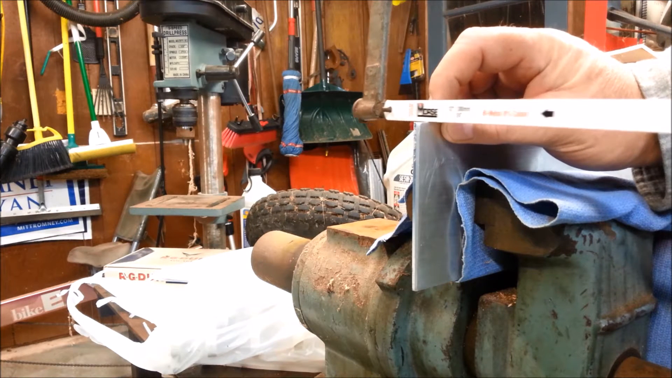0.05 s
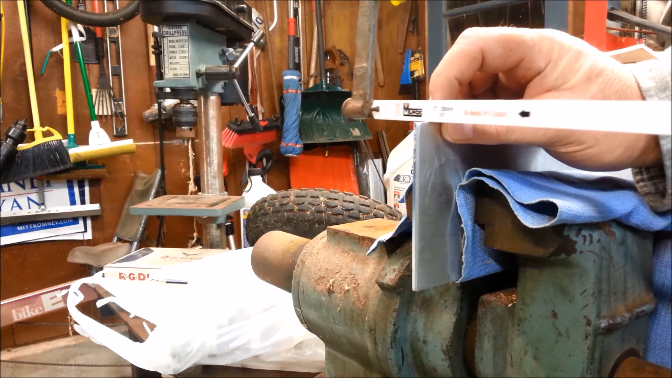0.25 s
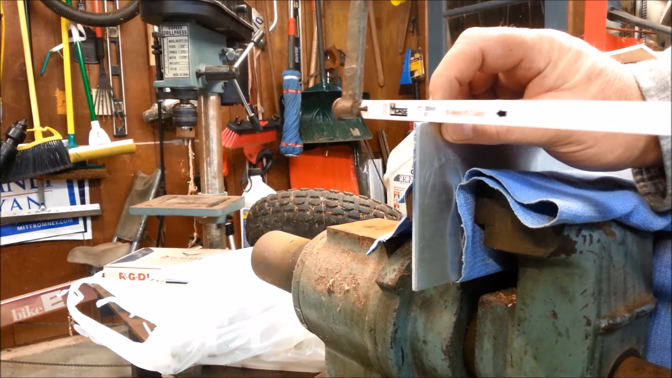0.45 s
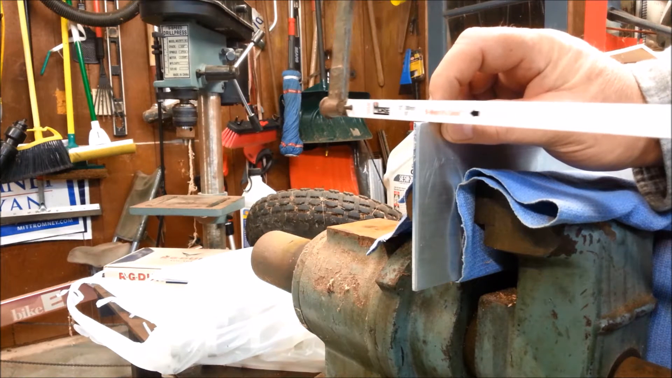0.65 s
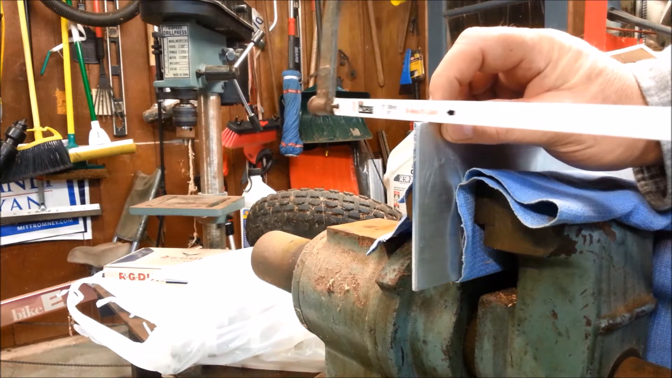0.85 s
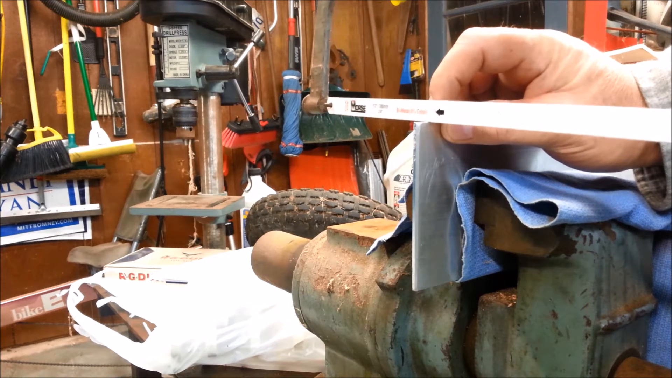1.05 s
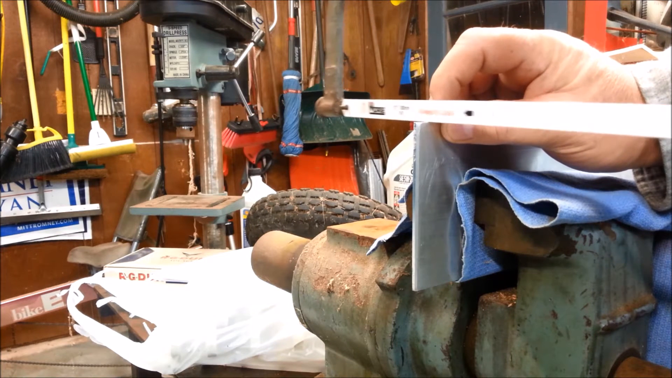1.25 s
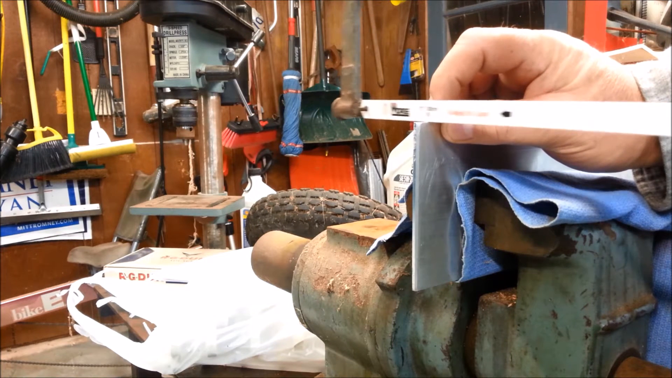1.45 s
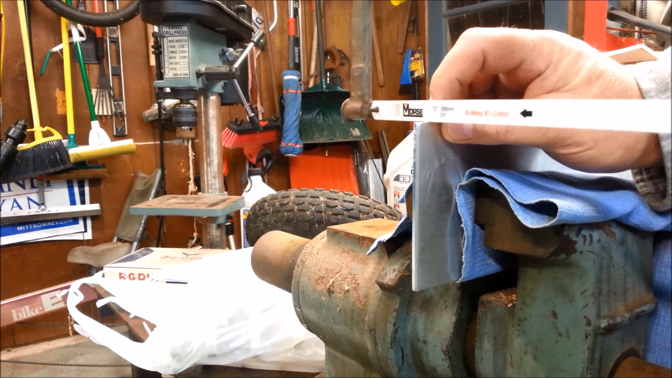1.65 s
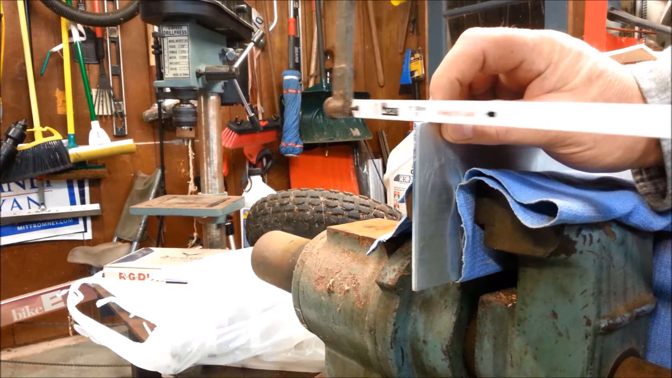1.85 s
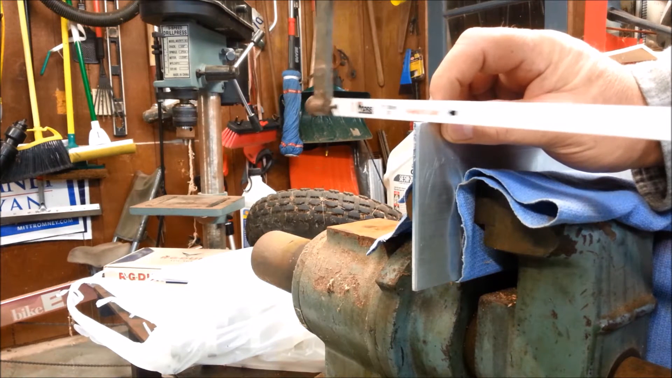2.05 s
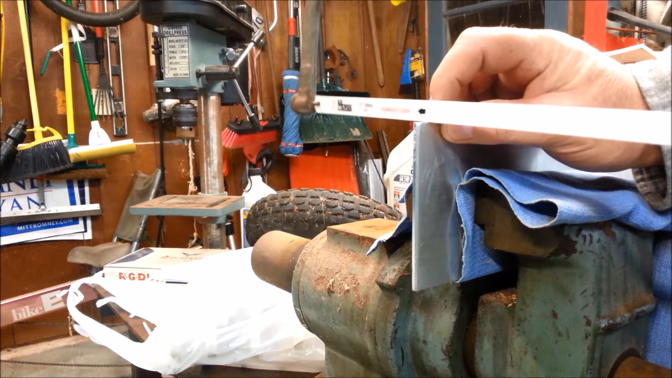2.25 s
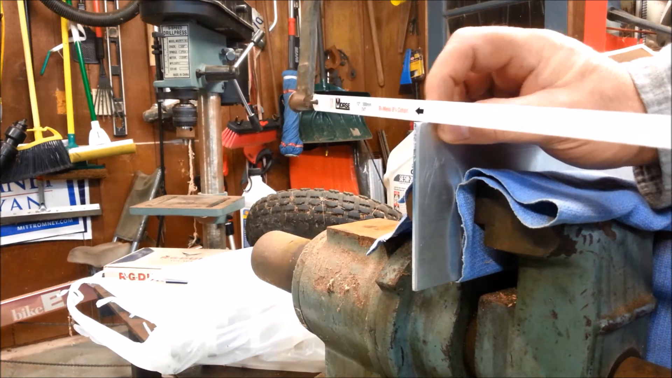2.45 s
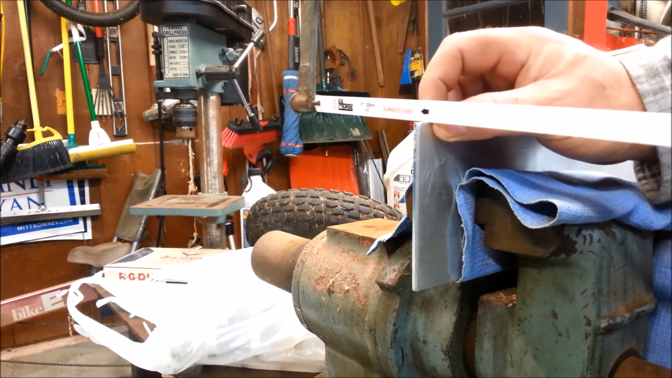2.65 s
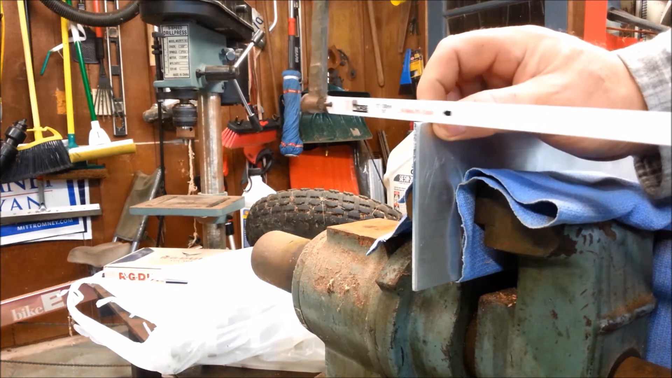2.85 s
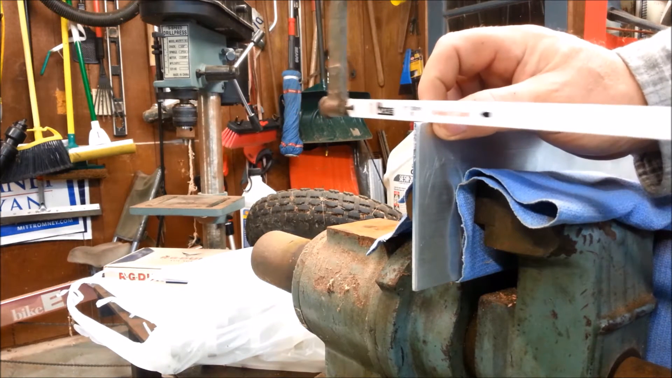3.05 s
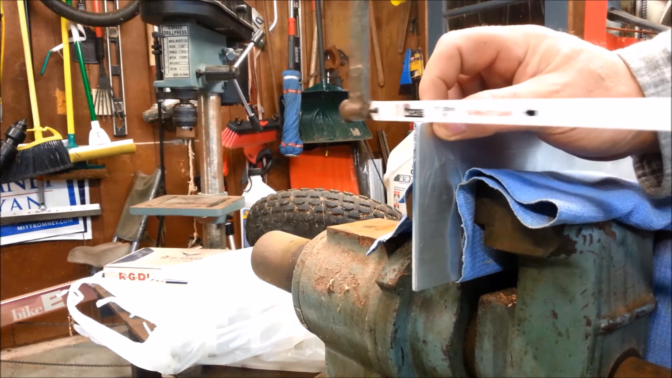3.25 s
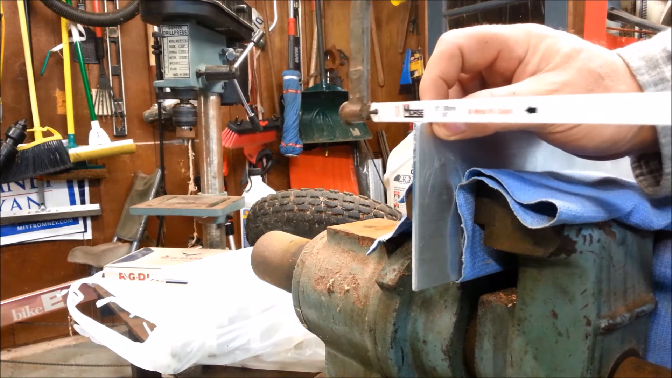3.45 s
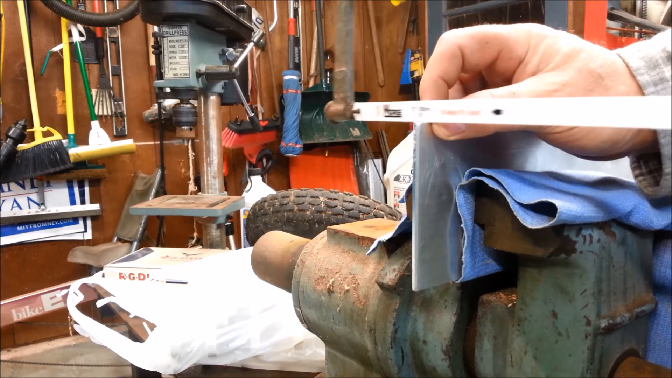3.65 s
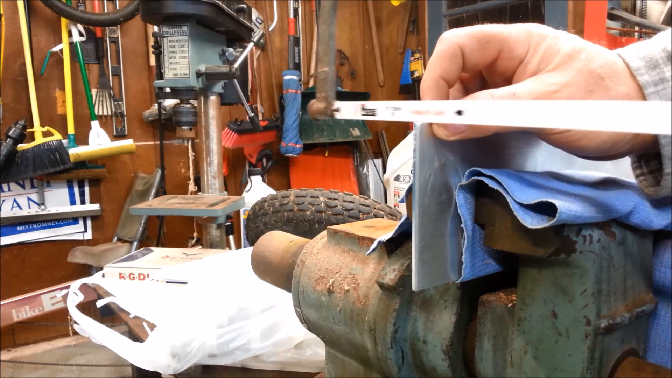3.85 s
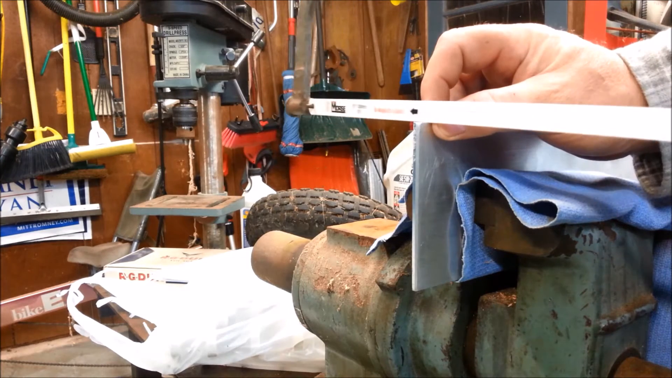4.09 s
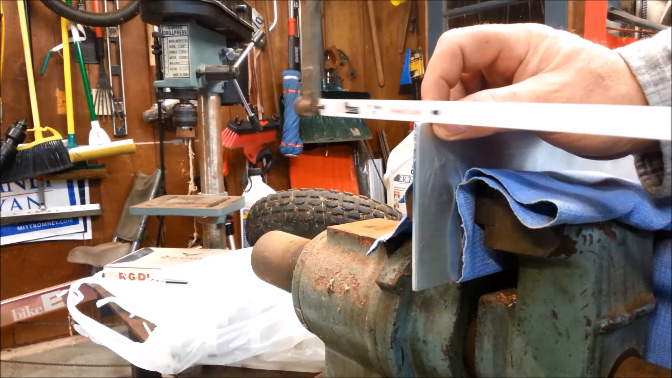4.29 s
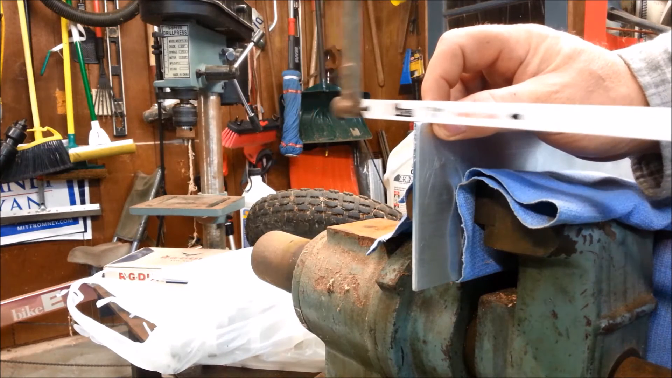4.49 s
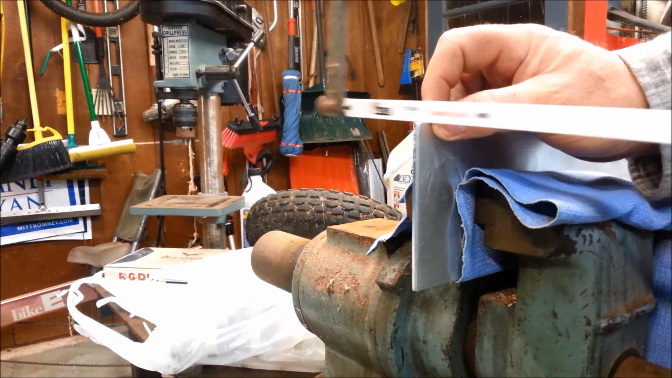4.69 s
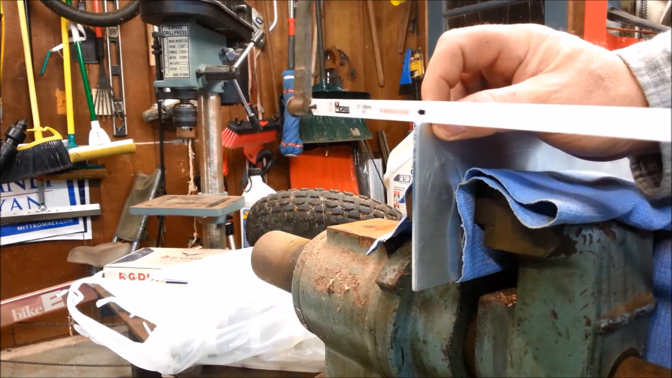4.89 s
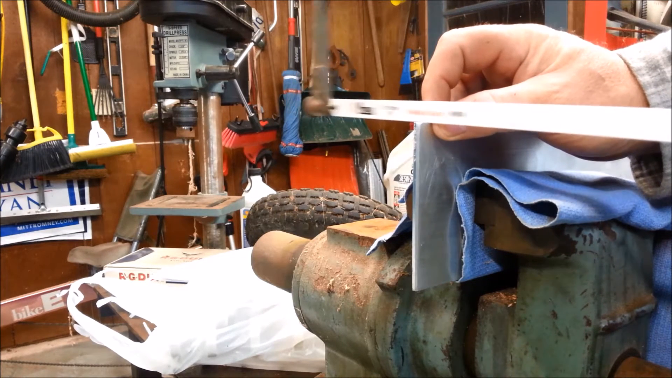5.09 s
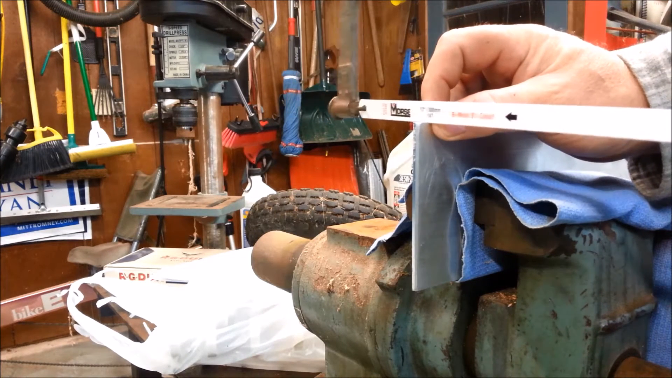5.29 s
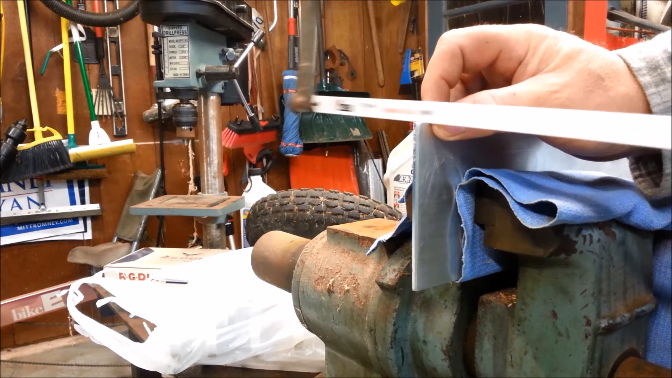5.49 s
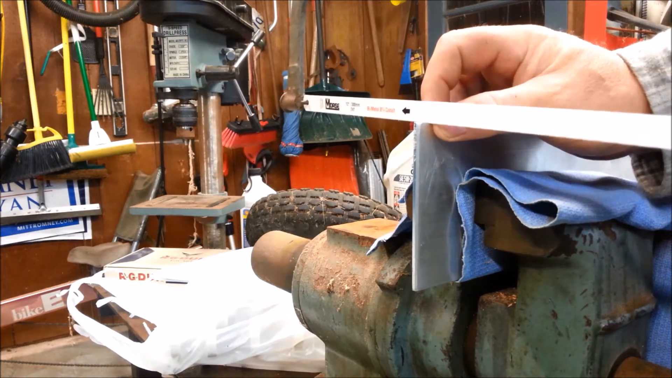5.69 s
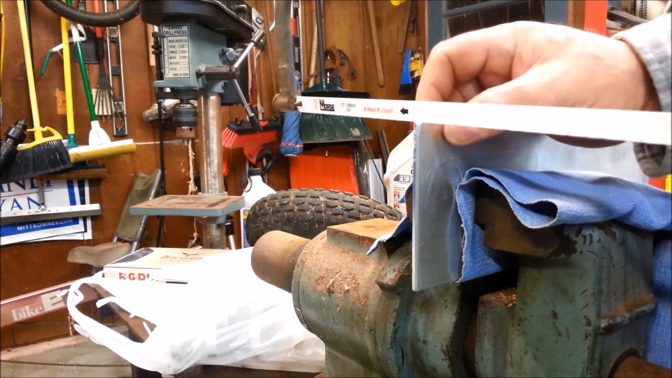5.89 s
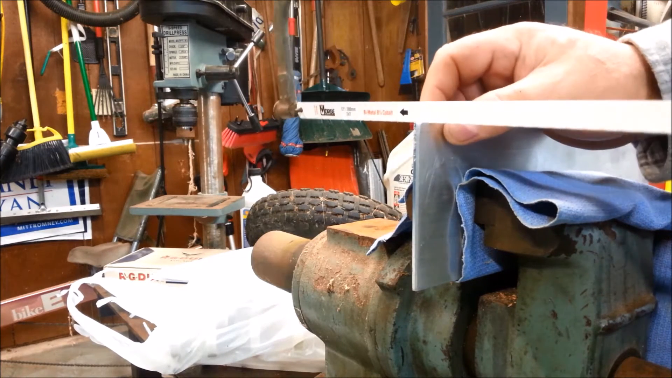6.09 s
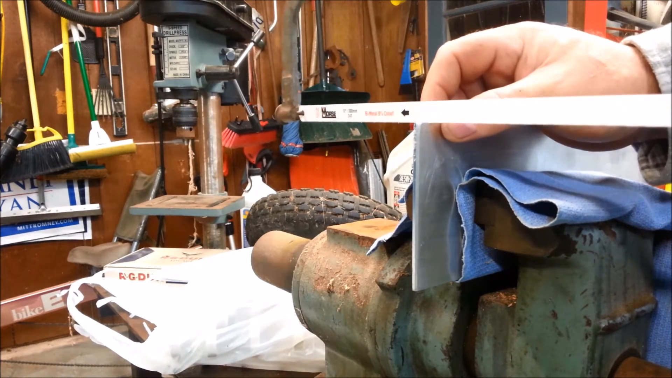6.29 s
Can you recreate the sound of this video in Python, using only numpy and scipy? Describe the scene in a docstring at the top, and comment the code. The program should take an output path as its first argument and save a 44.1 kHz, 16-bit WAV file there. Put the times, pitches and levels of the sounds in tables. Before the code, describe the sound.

In a small workshop, close up, a hacksaw cuts an aluminium plate clamped in a vise. From 0 to 1.05 s a slow, rather quiet stroke grates and swells, with sharp snags. Two firmer strokes follow, 1.13-1.7 and 1.76-2.4 s, juddering tooth by tooth with hard, ringing snaps; the last jams in a brief metallic twang. A short pause leaves the room tail, low rumble, hiss and soft rapid ticking on the left. Slow sawing resumes at 2.67-3.4 s, with a dull hand bump inside it and violent cracks around 3.1 s, then again at 3.5-4.2 s. Four fast, denser, louder rasps run from 4.28 to 5.68 s, a faint bump near 4.65 s. Echo fades; the resting blade gives tiny clicks at about 5.85 and 5.97 s, then only the background remains.

```python
"""A hacksaw cuts an aluminium plate held in a vise, in a small workshop with rumble, hiss and a left-hand flutter.
Three slow, catching strokes end in a twang; after a short pause come two more slow ones, then four fast ones.
Each tooth is a blow with a noisy chip crackle; snags are harder blows; all ring plate, frame and blade resonances.
Soft noise bumps fall in the fourth stroke and before the seventh.
At the end the resting blade taps the edge: clicks with brief sine rings. Decaying noise tails echo it all."""
import sys
import numpy as np
from scipy import signal
from scipy.fft import rfft, irfft, next_fast_len
from scipy.io import wavfile
from scipy.ndimage import map_coordinates

SR = 44100
rng = np.random.default_rng(int(sys.argv[2]) if len(sys.argv) > 2 else 0)


def wav_out(sig):
    """Save sig, one row per channel (or a flat mono array), as 16-bit PCM at SR to the path in sys.argv[1]."""
    wavfile.write(sys.argv[1], SR, np.round(np.clip(np.atleast_2d(sig).T, -1, 1) * 32767).astype(np.int16))


N = 279153  # samples in the scene

# saw strokes, levels before the common trim and waver: (start t/s, end t/s, steady level/dB, attack/s, release/s,
# bearing-down t/s, swell/dB, swell half-length/s, mid-stroke teeth rate/Hz, rubbing re teeth/dB, plate/dB, frame/dB)
STROKES = [(0, 1.055, -43.5, .05, .02, .98, 6.5, 0.3, 88, -1, .5, -4),
           (1.129, 1.685, -36, 0.046, 0.015, 1.3, 3.5, .06, 115, 0.5, -1.5, -5),
           (1.761, 2.386, -35.5, 0.058, 0.025, 2.17, 3, 0.074, 75.6, -2, 3.5, -2),
           (2.665, 3.4, -38, 0.061, 0.023, 3.14, 6, 0.23, 122, 0.5, -1, -2.5),
           (3.505, 4.23, -36.5, 0.018, 0.088, 4.05, 8, .11, 122, -4, 1.5, -2),
           (4.281, 4.63, -31, 0.0043, 0.062, 4.48, 7.5, 0.063, 218, 1, -2, -2.5),
           (4.67, 5.014, -25, 0.086, 0.083, 4.77, 3.5, 0.061, 190, -4.5, 1, -2),
           (5.056, 5.329, -26, 0.061, 0.07, 5.2, 4.5, 0.084, 263, -0.5, 0, -2.5),
           (5.369, 5.681, -26, 0.087, 0.068, 5.51, 7, 0.11, 275, -7.5, 2, -2)]
# teeth that snag and snap free, levels before the trims in snags():
# (t/s, blade level/dB, plate re blade/dB, frame re blade/dB)
SNAGS = [(0.1401, -21.5, -4, -16), (0.3157, -19.5, -8.5, -17), (0.4717, -19.5, -7.5, -5),
         (0.5616, -16.5, -4.5, -14.5), (0.6464, -12, -9, -30), (0.6689, -11.5, -12.5, -21),
         (0.6784, -17.5, -12, -6.5), (0.8014, -22, -3.5, -2.5), (0.9323, -19, -12, -4),
         (1.0126, -18, -5.5, -7.5), (1.036, -17, -8, -14), (1.1328, -13, -15.5, -11.5),
         (1.2471, -11, -11, -5.5), (1.2895, -9, -26, -2), (1.3074, -9.5, -25, -25), (1.3823, -15, -17, -17),
         (1.4965, -17, -11, -10), (1.5627, -3, -19.5, -22), (1.8113, -14, -8.5, -6),
         (2.0168, -5.5, -8, -12.5), (2.0966, -9.5, -10.5, -14), (2.1625, -16.5, -3, 3),
         (2.1949, -13, -4, -4), (2.2433, -11.5, -15, -4), (2.2553, -6, -28, -2.5), (2.3062, -19, -1, -1),
         (2.3366, -21.5, -5, 10), (2.3496, -9, -15, -2), (2.3644, -20.5, -9, 3), (3.0974, -9.5, -23, -17),
         (3.1053, -5, -14.5, -17), (3.1333, -2.5, -18, -15.5), (3.2196, -6, -16, -11),
         (3.3722, -15.5, -17, -21), (3.5084, -27, -2, -13), (3.5404, -20.5, -1, -13),
         (3.6516, -18.5, -2, -11), (3.8766, -17, -6, -2), (3.9833, -11, -7, -2.5), (4.0334, -12, -19, -11),
         (4.0552, -16.5, -25, -0.5), (4.0786, -11, -9, -8.5), (4.116, -8.5, -16, -7.5),
         (4.154, -12.5, -9, -7), (4.1604, -13.5, -8, -7), (4.2857, -25, -11, -4), (4.7611, -18, -10, -7),
         (4.7754, -7, -22, -5), (4.8354, -6, -13, -4), (4.8614, -4, -29, -9), (5.4297, -7, -13, -16),
         (5.4445, -5, -8.5, -5), (5.5268, -10, -19, -13), (5.6251, -3, -21, -5.5)]
# resonances of plate, blade and frame, relative: (f/Hz, width/Hz, left level/dB, right level/dB)
METAL_MODES = [(343, 200, -16.5, -23.5), (668, 130, -2, -2), (686.2, 56, 1, 1), (957, 304, -10, -13),
               (1203, 67, -8, -17.5), (1430, 250, -38, -16), (1622, 270, -9.5, -9), (1877, 380, -5, -6.5),
               (2055, 120, -7, -8), (2400, 310, -37, -12.5), (2860, 3920, -21, -23.5),
               (2728, 200, -2, -8.5), (3037, 103, -6, -1.5), (3334, 162, 2, 2), (3514, 295, -5.5, -3),
               (4120, 340, -11.5, -10), (4230, 1170, -18, -13.5), (5235, 120, -23, -15),
               (5510, 460, -42, -18.5), (6480, 1600, -28, -28.5), (8300, 600, -31.5, -35.5),
               (9900, 1320, -27, -30.5), (11500, 330, -32.5, -57), (13300, 1400, -40.5, -65.5)]
# colour of a snag's thin crack: (f/Hz, level/dB)
CRACK_COLOUR = [(3000, -34), (7000, -13), (10000, -1), (14000, 10)]
# soft bumps of the hand on the work, relative: (t/s, level/dB, pitch f/Hz)
HAND_BUMPS = [(2.865, -32, 475), (4.645, -31, 260)]
# colour of a bump: (multiple of its pitch, level/dB)
BUMP_COLOUR = [(.12, -33), (.5, -16), (1, -6), (1.8, -21), (6, -76)]
# the saw frame left ringing as it stops, relative: (f/Hz, level/dB, t60/s)
FRAME_TWANG = [(1860, 5.5, 0.23), (1972, 4, 0.31), (2730, -11, 0.18)]
# light touches of the resting blade on the edge, before the taps' tone filter: (t/s, level/dB, pitch f/Hz)
BLADE_TAPS = [(5.848, -42, 2780), (5.9595, -40, 1030), (5.976, -32.5, 3130)]
# ring of a tap: (multiple of its pitch, level/dB, t60/s)
TAP_MODES = [(1, 0.5, 0.018), (1.43, -3.5, 0.014)]
# vise and bench scatter short waves best: (f/Hz, level/dB)
SCATTER_COLOUR = [(700, -18), (2000, -4.5), (3300, -3.5), (4500, -4.5), (8000, -3)]
# how fast the bench scatter dies: (f/Hz, t60/s)
BENCH_DECAY = [(1000, .024), (12000, 0.013)]
# how fast the workshop echo dies: (f/Hz, t60/s)
WORKSHOP_DECAY = [(200, 0.2), (1000, 0.42), (3000, 0.35), (7000, 0.59), (14000, 0.516)]
# colour of the flutter ticks, relative: (f/Hz, level/dB)
FLUTTER_COLOUR = [(30, -39), (120, -8), (300, -2), (450, -3.5), (700, -19.5), (1200, -14.5), (2200, -43),
                  (6000, -54)]
# spectrum of rumble and hiss, relative: (f/Hz, level/dB per Hz)
AMBIENT_COLOUR = [(15, -48), (25, -15), (108, -7.5), (267, -1), (480, -4.5), (755, -13.5), (1190, -10),
                  (1430, -19.5), (1720, -16.5), (1970, -15.5), (4150, -17), (5560, -26), (9990, -19),
                  (14500, -27)]

CATCH_SHARE, CATCH_DB = .04, 4.5  # share of teeth that dig in deeper, and their size
# around this level the plate gains less than a dB for each dB of the blade: hard pushes sound brighter
EVEN_DB, PLATE_FOLLOWS = -34.5, .72
# hand pressure wavers: random points a second, depth for all parts together, depth for each alone
WAVER_HZ, WAVER_DB, WAVER_APART_DB = 18, .47, .5
# trims on the snag blows; the crack gains CRACK_TRADE dB for each dB less in the frame column
BLADE_TRIM_DB, PLATE_TRIM_DB, FRAME_TRIM_DB = 11.0, 19.5, 16.5
CRACK_DB, CRACK_TRADE = -28, .42
TAP_ATTACK_S, TAP_CLICK_DB, TAP_CLICK_T60_S = .00036, -1, .014
TOP_HZ = 14650  # upper band limit


def sawing():
    """Forces on blade, plate and frame: each stroke gets going, swells where the hand bears down, and stops."""
    force = np.zeros((3, N))
    for (start, end, steady_db, attack_s, release_s, push, push_db, push_s,
         tooth_hz, rub_db, plate_db, frame_db) in STROKES:
        cut = teeth(end - start, tooth_hz, rub_db, jitter=.15, scatter_db=3.0, colour_db=1.0)
        t = start + np.arange(cut.shape[1]) / SR
        effort_db = steady_db + push_db * np.exp(-((t - push) / push_s) ** 2)
        fade_in = np.clip((t - start) / attack_s, 0, 1)
        fade_out = np.clip((end - t) / release_s, 0, 1)
        plate_effort_db = EVEN_DB + PLATE_FOLLOWS * (effort_db - EVEN_DB) + plate_db
        parts_db = [effort_db, plate_effort_db, effort_db + frame_db]
        add(force, start, fade_in * fade_out * amp(parts_db) * cut)
    apart = np.array([wobble(WAVER_HZ) for part in force])
    waver_db = WAVER_DB * wobble(WAVER_HZ) + WAVER_APART_DB * apart
    return amp(-1) * force * amp(waver_db)


def teeth(seconds, tooth_hz, rub_db, jitter, scatter_db, colour_db):
    """Tooth blows, passing fastest in mid-stroke, over the rubbing of the flanks; three forces, rms 1 overall."""
    n = round(seconds * SR)
    speed = .5 + .5 * np.sin(np.pi * np.arange(n) / n)
    teeth_passed = np.cumsum(speed * tooth_hz / SR) + rng.random()
    passes = np.flatnonzero(np.diff(np.floor(teeth_passed))) / SR
    caught = rng.random(len(passes)) < CATCH_SHARE
    force = np.zeros((3, n))
    for s, catch, chance in zip(passes, caught, rng.standard_normal((len(passes), 5))):
        size_db = CATCH_DB if catch else scatter_db * np.clip(chance[1], -2, 1.5)
        parts_db = size_db + colour_db * chance[2:, None]  # every tooth lands a little differently
        # jitter is a share of the mid-stroke tooth spacing
        add(force, s + jitter * chance[0] / tooth_hz, amp(parts_db) * bite(tear=.79, t60=.015))
    rubbing = amp(rub_db) * rng.standard_normal(n)
    return unit(unit(force) + rubbing)


def bite(tear, t60):
    """Force of one tooth, energy 1: a sharp blow, then the dying crackle of the chip."""
    t = np.arange(SR // 20) / SR
    force = rng.standard_normal(len(t)) * amp(-60 * t / t60)
    force *= tear / np.linalg.norm(force)
    force[0] += 1
    return force / np.linalg.norm(force)


def snags():
    """A caught tooth lets go with one hard blow: forces on blade, plate and frame, and a thin crack."""
    force = np.zeros((4, N))
    for s, blade_db, plate_db, frame_db in SNAGS:
        crack_db = CRACK_DB - CRACK_TRADE * frame_db
        parts_db = np.array([[BLADE_TRIM_DB], [plate_db + PLATE_TRIM_DB],
                             [frame_db + FRAME_TRIM_DB], [crack_db]])
        # the blow lands 0.8 ms after the listed time
        add(force, s + .0008, amp(blade_db + parts_db) * bite(tear=.8, t60=.024))
    return force


def metal(forces, plate_top_hz, frame_top_hz, radiate_hz, size=8192):
    """Low modes belong to the plate, middle ones to the frame, high ones to the blade; each side has its own mix."""
    hz = np.fft.rfftfreq(size, 1 / SR)
    power = 0
    for f, width, left, right in METAL_MODES:
        power = power + amp([[left], [right]]) ** 2 / (1 + (2 * (hz - f) / width) ** 2) ** 2
    power = power / (1 + (radiate_hz / (hz + 1)) ** 2) ** 2  # small parts radiate little bass
    low = 1 / (1 + (hz / plate_top_hz) ** 14)
    below_blade = 1 / (1 + (hz / frame_top_hz) ** 14)
    shares = (1 - below_blade, low, below_blade * (1 - low))  # blade, plate, frame
    sound = np.zeros((2, N))
    for force, share in zip(forces, shares):
        ring = causal(np.sqrt(power * share))
        ring = ring * np.sqrt(2) / np.linalg.norm(ring)
        sound += signal.fftconvolve(force[None], ring, axes=1)[:, :N]
    return sound


def handling():
    """Dull bumps of the hand as coloured noise, and the frame's decaying sine twang as the third stroke jams."""
    track, t = np.zeros(N), np.arange(SR // 2) / SR
    for s, db, pitch_hz in HAND_BUMPS:
        swell = 1 - np.exp(-t / .0074)
        push = amp(db + 28 - 60 * t / .081) * swell * rng.standard_normal(len(t))
        colour = [(multiple * pitch_hz, level) for multiple, level in BUMP_COLOUR]
        add(track, s, filtered(push, lambda hz: amp(along(colour, hz))))
    twang = sum(amp(db - 60 * t / t60) * np.sin(2 * np.pi * hz * t) for hz, db, t60 in FRAME_TWANG)
    add(track, 2.35, amp(-35.5) * twang)
    return track


def taps():
    """The resting blade touches the edge: a small noise click and a brief ring of decaying sines."""
    track, t = np.zeros(N), np.arange(SR // 10) / SR
    for s, db, pitch_hz in BLADE_TAPS:
        ring = sum(amp(level - 60 * t / t60) * np.sin(2 * np.pi * multiple * pitch_hz * t)
                   for multiple, level, t60 in TAP_MODES)
        click = amp(TAP_CLICK_DB - 60 * t / TAP_CLICK_T60_S) * rng.standard_normal(len(t))
        attack = 1 - np.exp(-t / TAP_ATTACK_S)
        add(track, s, amp(db) * attack * (ring + click))
    return filtered(track, lambda hz: amp(along([(1000, 4), (4500, 1), (7000, -10)], hz)))


def echoes(x, decay, gap_s, count):
    """A diffuse tail of decaying noise, crossfaded to a fresh one count times as the saw and the arm move."""
    wet = np.zeros((2, N))
    length = round(SR * max(t60 for hz, t60 in decay))
    hz, t, z = signal.stft(rng.standard_normal((count + 1, 2, length)), SR, nperseg=256)
    fade = amp(-60 * t / along(decay, hz)[:, None])
    tails = signal.istft(z * fade, SR, nperseg=256)[1]
    for k, tail in enumerate(tails):
        span = np.arange(max((k - 1) * N // count, 0), min((k + 1) * N // count, N))
        piece = x[:, span] * np.cos(np.pi / 2 * (span * count / N - k))
        echo = signal.fftconvolve(piece, tail / np.linalg.norm(tail[0]), axes=1)
        add(wet, span[0] / SR + gap_s, echo)
    return wet


def flutter(left_db, right_db, uneven_db):
    """Soft, regular ticks, about 30 a second: filtered impulses, heard on the left."""
    times = np.arange(.0311, N / SR, 1 / 30.03)
    sizes = amp(uneven_db * rng.standard_normal(len(times)))
    ticks = np.bincount((times * SR).astype(int), sizes, minlength=N)
    coloured = unit(filtered(ticks, lambda hz: amp(along(FLUTTER_COLOUR, hz))))
    return -amp([[left_db], [right_db]]) * coloured


def ambience(level_db, shared, tone_db):
    """Room rumble and hiss from partly shared stereo noise, and a very faint steady sine at 12441 Hz."""
    noise = rng.standard_normal((2, N)) + shared * rng.standard_normal(N)
    bed = unit(filtered(noise, lambda hz: amp(along(AMBIENT_COLOUR, hz))))
    high_tone = np.sin(2 * np.pi * 12441 * np.arange(N) / SR)
    return amp(level_db) * bed + amp(tone_db) * high_tone


def amp(db):
    """Decibels to gain."""
    return 10 ** (np.asarray(db) / 20)


def unit(x):
    """Scaled to rms 1."""
    return x / np.sqrt(np.mean(x ** 2) + 1e-20)


def along(points, hz):
    """Interpolate (f/Hz, value) points on a log frequency axis."""
    f, v = np.transpose(points)
    return np.interp(np.log(hz + 1), np.log(f + 1), v)


def filtered(x, response):
    """x times a response of frequency."""
    m = next_fast_len(N + SR // 2)
    return irfft(rfft(x, m) * response(np.fft.rfftfreq(m, 1 / SR)), m)[..., :N]


def causal(gain):
    """The minimum-phase impulse response with this magnitude: it starts at once and then rings."""
    cepstrum = irfft(np.log(np.maximum(gain, 1e-6)))
    half = cepstrum.shape[-1] // 2
    cepstrum[..., 1:half] *= 2
    cepstrum[..., half + 1:] = 0
    return irfft(np.exp(rfft(cepstrum)))


def wobble(rate_hz):
    """A smooth random curve through rate_hz random points a second."""
    return map_coordinates(rng.standard_normal(400), [np.arange(N) * rate_hz / SR], mode="mirror")


def add(track, s, sound):
    """Mix a sound into a track from time s in seconds."""
    part = track[..., max(round(s * SR), 0):][..., :sound.shape[-1]]
    part += sound[..., :part.shape[-1]]


def scene():
    """The saw close up, scattered by vise and bench, in the small room over its background."""
    *snag_forces, crack = snags()
    saw = metal(sawing() + snag_forces, plate_top_hz=1082, frame_top_hz=2480, radiate_hz=112)
    saw = saw + handling() + taps()
    saw += amp([[2], [-3]]) * filtered(crack, lambda hz: amp(along(CRACK_COLOUR, hz)))
    lead_s = 3.3e-5  # the direct sound reaches the left side first by this much
    sides = np.array([[1], [-1]])
    direct = filtered(saw, lambda hz: np.exp(np.pi * 1j * hz * lead_s * sides))
    scattered = filtered(saw, lambda hz: amp(along(SCATTER_COLOUR, hz)))
    near = echoes(scattered, BENCH_DECAY, gap_s=.0005, count=140)
    room = amp(-7) * echoes(saw, WORKSHOP_DECAY, gap_s=.005, count=20)
    background = flutter(left_db=-46.5, right_db=-105, uneven_db=0.0)
    background = background + ambience(level_db=-51, shared=.29, tone_db=-78)
    return direct + near + room + background


def record(dry):
    """The loudest blows are clipped flat, then everything above the band limit is cut."""
    return filtered(np.clip(dry, -.92, .92), lambda hz: hz < TOP_HZ)


dry = scene()
out = record(dry)
wav_out(out)
```